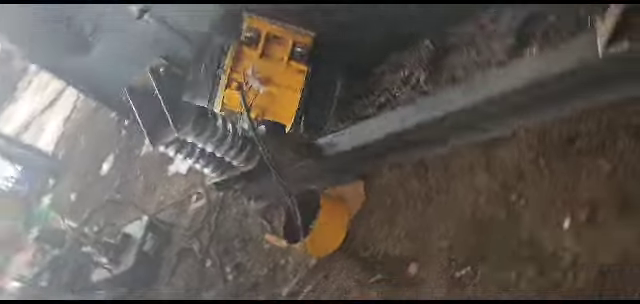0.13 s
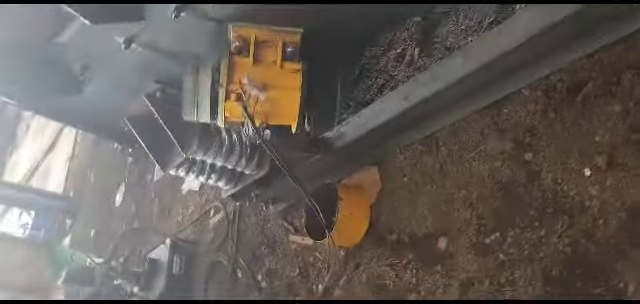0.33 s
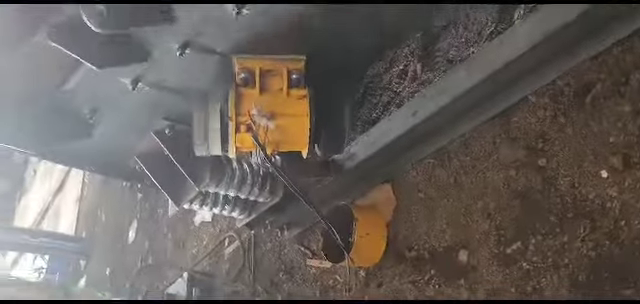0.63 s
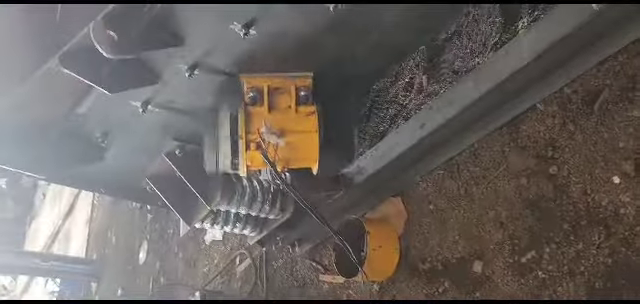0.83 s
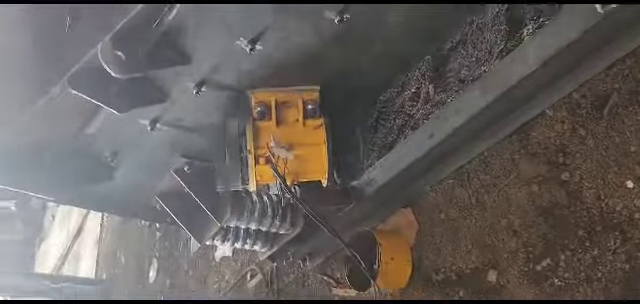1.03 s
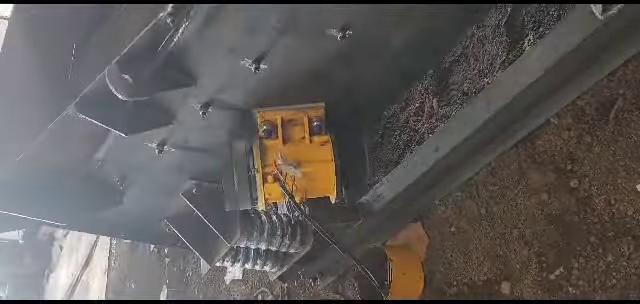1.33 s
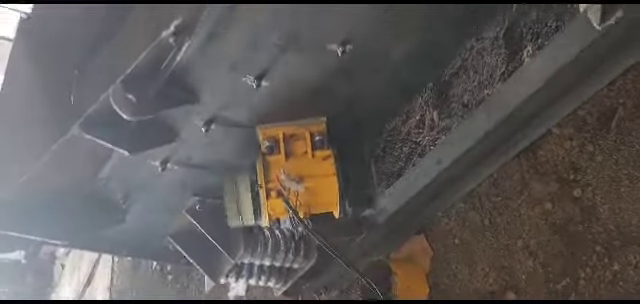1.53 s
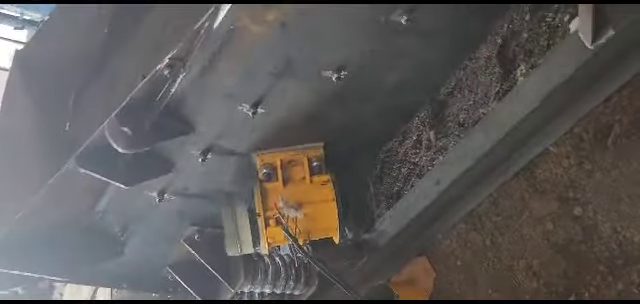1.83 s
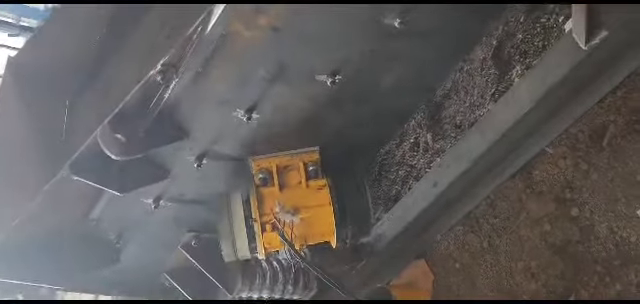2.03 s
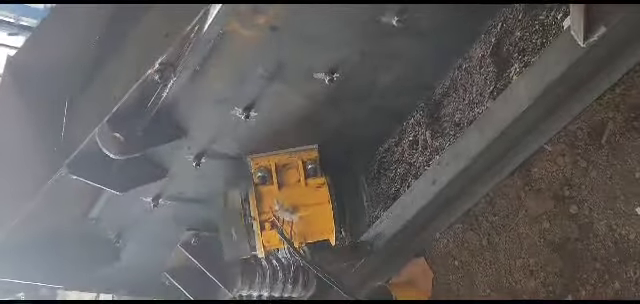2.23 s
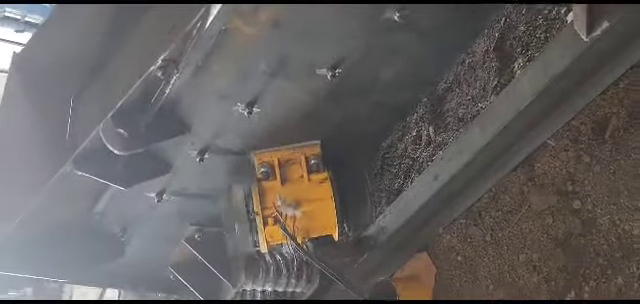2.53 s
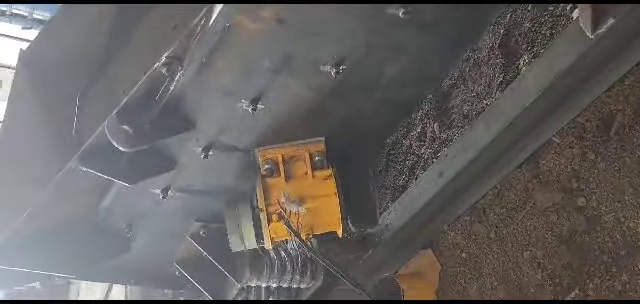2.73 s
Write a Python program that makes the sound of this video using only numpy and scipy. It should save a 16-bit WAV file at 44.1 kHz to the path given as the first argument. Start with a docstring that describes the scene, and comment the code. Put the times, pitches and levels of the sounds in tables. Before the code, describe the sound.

A vibration motor shakes a big steel hopper, giving a loud low drone with very fast regular plate slaps and dense rattling; a small metal part clanks faintly near the one-second mark; close microphone in an industrial yard.

```python
"""A large steel hopper drones and clatters as a vibration motor shakes it, heard from close by.
Sines at the shaft's multiples make the drone; noise bursts repeated every turn are plates that slap
and ring. Dense coloured noise roars under them as a rattle, random knocks jingle a loose part,
noise keeps a few wall modes ringing, and brief rough contacts clank a small metal part now and then."""
import sys
import numpy as np
from scipy import signal
from scipy.fft import rfft, irfft
from scipy.io import wavfile
from scipy.ndimage import uniform_filter1d

SR = 44100
rng = np.random.default_rng(int(sys.argv[2]) if len(sys.argv) > 2 else 0)


def waveform_to_disk(signal):
    """Save audio, clipped to [-1, 1], as 16-bit WAV at the path in sys.argv[1]."""
    frames = np.transpose(np.atleast_2d(signal))
    scaled = np.clip(frames, -1, 1) * 32767
    samples = np.round(scaled).astype(np.int16)
    wavfile.write(sys.argv[1], SR, samples)


N = 127008

SHAFT_HZ = 16.612  # turns per second
FIRST_TURN_S = .0602  # where a turn begins: place 0


def undb(db):
    """dB to gain."""
    return 10 ** (np.asarray(db) / 20)


def level(x, db):
    """Set the rms level over both channels, in dB."""
    return x * undb(db) / np.sqrt(np.mean(x ** 2))


def read(table, hz):
    """Value of a (f/Hz, value) table on a log-frequency axis."""
    table = np.array(table)
    return np.interp(np.log(hz + 1), np.log(table[:, 0] + 1), table[:, 1])


def follow(table, t):
    """Value of a (t/s, value) table, in straight lines between its points."""
    return np.interp(t, *np.array(table).T)


def walk(rate):
    """Random levels held 1 / rate s and smoothed twice; spread near 1."""
    hold = int(SR / rate)
    steps = np.repeat(rng.standard_normal(N // hold + 1), hold)
    smooth = uniform_filter1d(uniform_filter1d(steps, hold), hold)
    return 1.3 * smooth[:N]  # makes up for the spread lost in smoothing


def ring(x, modes):
    """Excite decaying two-pole resonators, (f/Hz, level/dB, t60/s), with x."""
    out = 0
    for f, db, t60 in modes:
        radius = np.exp(-np.log(1000) / (t60 * SR))
        w = 2 * np.pi * f / SR
        feedback = [1, -2 * radius * np.cos(w), radius * radius]
        out = out + undb(db) * np.sin(w) * signal.lfilter([1], feedback, x)
    return out


def plates(shape, colour):
    """Stereo spectrum of noise shaped in time, coloured and rung through steel plate resonances."""
    # plate resonances: f/Hz, width/Hz, left lift/dB, right lift/dB
    resonances = [(656, 8, 11, 3), (758, 8.9, 10, -2), (826.6, 7.9, 8.5, 9.5), (960, 12, 6.5, -7.5),
                  (1040, 11, 4, 6.5), (1106, 16, 6.5, 5.5), (1170, 9.2, 3.5, 4), (1210, 26, 1.5, 6),
                  (1393, 16, 3, 8.5), (1490, 15, 5.5, -10.5), (1631, 9.1, 4.5, -1), (1823, 22, 10.5, 5),
                  (1986, 26, 6, 3.5), (2080, 11.4, 8, 10.5), (2232, 17, 3, 4.5), (2307, 11.3, 10, 14),
                  (2834, 64, 5.5, 2), (3110, 67, 7, 7), (3390, 52, 5.5, 1), (3750, 28, 7.5, 5.5),
                  (5100, 92, 4, 6.5), (5450, 116, 3.5, 5.5), (6280, 150, 5.5, 5), (7460, 80, 2, 10),
                  (9000, 74, 4, -19)]
    # likeness of left and right: f/Hz, correlation (0-1)
    likeness = [(60, 0.91), (130, 0.97), (290, 0.96), (640, 0.22), (1410, 0.28), (3100, 0.02), (6820, 0.13),
                (15000, 0)]
    # tonal lean to the left, on top of the resonances: f/Hz, left minus right/dB
    lean_table = [(60, -1), (200, 2.5), (450, 5.5), (900, 0.8), (1700, 0.5), (2600, -0.2), (4200, 2.4),
                  (5200, -1.5), (7500, 3.8), (9300, 0), (11000, 3.5), (12200, -2), (14000, 1), (15500, -1)]
    dense_db, dense_hz = 2.5, 15  # depth and width of the countless small resonances

    hz = np.arange(N // 2 + 1) * SR / N
    width = int(dense_hz * N / SR)
    dense = uniform_filter1d(rng.standard_normal((2, len(hz))), width) * np.sqrt(width)
    depth_db = dense_db * np.clip(hz / 1000, 0, 1)  # full depth from 1 kHz up
    gain = undb(read(colour, hz) + depth_db * dense) + 0j
    for f, wide, left_db, right_db in resonances:
        lift = undb([[left_db], [right_db]])
        gain = gain * (1 + (lift - 1) / (1 + 2j * (hz - f) / wide))

    like = np.clip(read(likeness, hz), 0, 1)
    mid, side = rfft(shape * rng.standard_normal((2, N)))
    mid = mid * np.sqrt(1 + like)
    side = side * np.sqrt(1 - like)
    lean = undb(read(lean_table, hz) / 2)
    return np.array([(mid + side) * lean, (mid - side) / lean]) * gain, hz


def drone(t):
    """Sines at the shaft's multiples waver in level; the higher ones drift more in phase."""
    # the walls' drone: multiple of the shaft speed, relative level/dB
    multiples = [(3, -25.5), (4, -21.8), (5, -18.6), (6, -17.8), (7, -24.1), (8, -20.8), (9, -13.9),
                 (10, -17.3), (11, -22.1), (12, -24.0), (13, -27.0), (14, -22.4), (15, -27.7), (16, -12.4),
                 (17, -27.2), (18, -11.9), (19, -28.2), (20, -21.1), (21, -22.2), (22, -24.3), (23, -21.6),
                 (24, -14.9), (25, -21.1), (26, -22.6), (27, -30.6), (28, -32.0), (29, -24.0), (30, -27.7),
                 (31, -20.9), (32, -24.7), (33, -26.0), (34, -27.7), (35, -26.7), (37, -22.8), (41, -23.2),
                 (42, -15.8), (43, -18.5), (44, -24.0), (45, -18.7), (46, -18.8), (47, -23.4), (48, -22.0),
                 (49, -26.1), (52, -25.8)]
    waver_db, waver_per_s = 1.64, 3.12
    drift_rad, spread_rad = .04, .62  # phase drift and left-right phase spread at 700 Hz
    out = 0
    for k, db in multiples:
        high = k * SHAFT_HZ / 700
        start = rng.uniform(-np.pi, np.pi)
        apart = spread_rad * high * rng.standard_normal()
        phase = 2 * np.pi * k * SHAFT_HZ * t + start + drift_rad * high * walk(waver_per_s)
        gain = undb(db + waver_db * walk(waver_per_s))
        out = out + gain * np.sin(phase + np.array([[apart], [-apart]]) / 2)
    return level(out, -14)


def slaps(t):
    """Loose plates slap in the same pattern every turn: sudden fading bursts of varying strength."""
    # slaps within one turn: place in the turn (0-1), relative body/dB, relative treble/dB, power fade/s
    pattern = [(.945, 1.5, -1.5, 0.0037), (.985, -2, 0.5, 0.0042), (.06, -2.5, -3.5, .004),
               (.12, -5.5, -3, 0.0038), (0.198, -7, -7, 0.0017), (.31, -8, -9, .003),
               (0.618, -9.5, -2.5, 0.0047), (0.738, -10, -6, 0.0025), (0.839, -12, -10, .003)]
    # how hard the plates slap over time: t/s, relative level/dB
    force = [(.1, 0), (.5, 0), (1.0, -0.3), (1.3, 1), (1.7, -1.5), (1.82, 0.5), (2.3, 1.5), (2.7, 1.6),
             (2.87, -2)]
    # colour of the slaps: f/Hz, relative density/dB per Hz
    slap_colour = [(290, -29), (500, -8.5), (638, -21), (726, -5), (914, -22.5), (1060, -8), (3150, -11.5),
                   (4020, -15.5), (5200, -16.5), (15500, -30.5)]
    jitter_s, scatter_db = .0004, 1.3
    treble_hz = 4000  # crossover from body to treble

    turns = np.arange(-1, int(N / SR * SHAFT_HZ) + 1)
    power = np.zeros((2, N))
    for place, body_db, treble_db, fade in pattern:
        chance = rng.standard_normal((len(turns), 2))
        at_s = FIRST_TURN_S + (turns + place) / SHAFT_HZ + jitter_s * chance[:, 0]
        at = (at_s * SR).astype(int)
        inside = (at >= 0) & (at < N)
        kicks = np.zeros(N)
        kicks[at[inside]] = undb(scatter_db * chance[inside, 1]) ** 2
        bursts = signal.lfilter([1], [1, -np.exp(-1 / (fade * SR))], kicks)
        power += undb([[body_db], [treble_db]]) ** 2 * bursts
    shape = np.sqrt(power) * undb(follow(force, t))

    body, hz = plates(shape[0], slap_colour)
    treble, _ = plates(shape[1], slap_colour)
    high = 1 / (1 + (treble_hz / (hz + 1)) ** 4)  # treble's share of the power
    return level(irfft(body * np.sqrt(1 - high) + treble * np.sqrt(high), N), -20.5)


def rattle(t):
    """Dense plate noise in octave bands that swell very slightly together and flicker alone."""
    # colour of the rattle: f/Hz, relative density/dB per Hz
    rattle_colour = [(18, -42), (30, -15), (152, -6), (213, -13.5), (277, -5.5), (400, -6.5), (456, -9),
                     (623, -9), (711, -4.5), (923, -8), (1050, -7), (2310, -15.5), (3990, -23),
                     (5190, -20.5), (8310, -28.5), (13000, -28), (15600, -30)]
    # low rumble over time: t/s, relative level/dB
    rumble = [(.1, .3), (.8, -0.5), (1.1, 2), (1.6, 3.5), (1.9, -1), (2.2, 1), (2.87, .3)]
    flicker_db, swell_db = 1, .07
    spectrum, hz = plates(np.ones(N), rattle_colour)
    swell = walk(3.0)
    rumble_db = follow(rumble, t)
    out = 0
    for octave in range(5, 15):  # bands centred on 2 ** octave Hz
        band = np.clip(1 - np.abs(np.log2(hz + 1) - octave), 0, 1)
        band_db = swell_db * swell + flicker_db * walk(14)
        if octave < 8:
            band_db = band_db + rumble_db
        out = out + irfft(spectrum * band, N) * undb(band_db)
    return level(out, -15.5)


def jingle(t):
    """Small random knocks ring a loose part, stronger in patches and twice a turn."""
    # what the loose part rings with: f/Hz, relative level/dB, t60/s
    jingle_modes = [(5026, 5.5, .03), (5420, -1.5, .03), (6530, -9, .025)]
    knocks_per_s, scatter_db = 130, 3.5
    patch_db, patches_per_s = 4, 8.7
    flare_db, flare_place = 3, .04  # flares at this place in the turn and half a turn later
    left_db = -8  # dB on the left, opposite on the right: the jingle sits well to the right

    strength_db = scatter_db * rng.standard_normal(N) + patch_db * walk(patches_per_s)
    hits = (rng.random(N) < knocks_per_s / SR) * undb(strength_db)
    turn = (t - FIRST_TURN_S) * SHAFT_HZ - flare_place
    hits = hits * undb(flare_db * np.cos(2 * 2 * np.pi * turn))
    # each knock is a noise burst of 40 samples, just under 1 ms
    smear = uniform_filter1d(hits, size=40) * rng.standard_normal((2, N))
    # left gets left_db, right gets its opposite; both gains halved
    pan = undb(np.array([[left_db], [-left_db]])) / 2
    return level(ring(smear, jingle_modes) * pan, -32)


def wall(t):
    """Noise from the shaking keeps a few wall modes ringing, louder early on."""
    # modes of the wall: f/Hz, relative level/dB, t60/s
    wall_modes = [(765, -2, .3), (820, 0, .35), (1054, -5, .3)]
    # the ring over time: t/s, level/dB
    wall_level = [(.1, -31), (.3, -28), (.6, -31), (1.0, -35), (1.6, -33), (2.0, -38), (2.87, -38)]
    noise = rng.standard_normal(N) + .4 * rng.standard_normal((2, N))  # shared, plus some per channel
    return level(ring(noise, wall_modes), 0) * undb(follow(wall_level, t))


def clanks(t):
    """Each brief rough contact is a crack of noise that also sets a small metal part ringing."""
    # contacts: t/s, ring drive/dB, crack before its band-pass/dB, contact fade/s, crack centre f/Hz
    contacts = [(1.1075, -25, -16, .004, 6200), (1.118, -23, -20, .008, 6500),
                (1.136, -18, -21, .018, 8000), (1.17, -25, -27, .012, 7500), (1.198, -27, -24, .012, 7000),
                (1.235, -28, -28, .02, 7500), (1.4213, -22, -16, .007, 8500)]
    # what the clanking part rings with: f/Hz, relative level/dB, t60/s
    clank_modes = [(2266, -2, .2), (4750, -5, .04), (5297, -3, .08), (6100, -5, .05), (6600, -5, .04),
                   (7590, -5, .06), (7693, 0, .13), (7790, -4, .07), (13600, -9, .05), (15470, -6, .1)]
    push, crack = np.zeros((2, N)), np.zeros((2, N))
    for at, ring_db, crack_db, fade, hz in contacts:
        envelope = np.exp(-np.clip(t - at, 0, None) / fade) * (t >= at)
        touch = envelope * rng.standard_normal((2, N))
        push += undb(ring_db) * touch / np.sqrt(fade * SR / 2)  # same energy for any fade
        band = signal.butter(1, [0.59 * hz, 1.7 * hz], "band", fs=SR, output="sos")
        crack += undb(crack_db) * signal.sosfilt(band, touch)
    return ring(push, clank_modes) + crack


def scene():
    """Drone, slaps, rattle, jingle, wall ring and clanks together."""
    t = np.arange(N) / SR
    return drone(t) + slaps(t) + rattle(t) + jingle(t) + wall(t) + clanks(t)


def record(dry):
    """After a short silence the sound starts abruptly; saturation rounds peaks, a steep filter cuts the top."""
    start_s, rise_s, top_hz = .0697, .00055, 15720
    on = np.clip((np.arange(N) / SR - start_s) / rise_s, 0, 1)
    rounded = np.tanh(.7 * dry * on) / .7
    low_pass = signal.ellip(16, .5, 80, top_hz, fs=SR, output="sos")  # .5 dB ripple, 80 dB stop
    return signal.sosfilt(low_pass, rounded)


dry = scene()
out = record(dry)
waveform_to_disk(out)
```